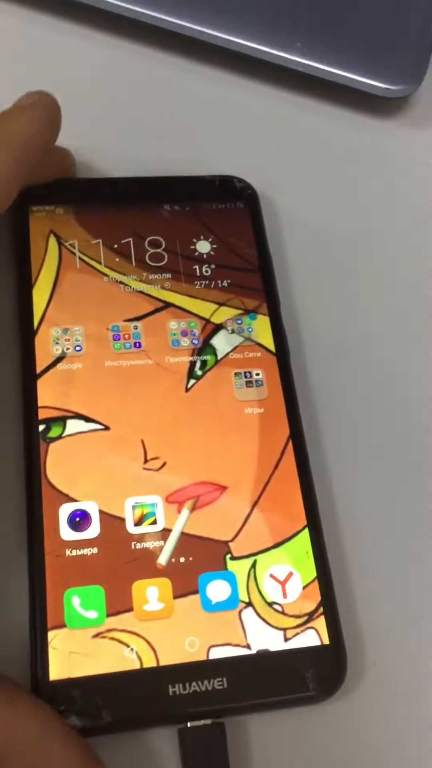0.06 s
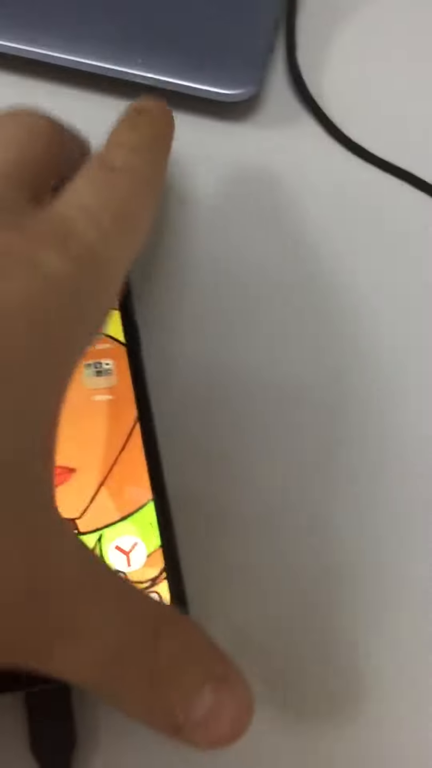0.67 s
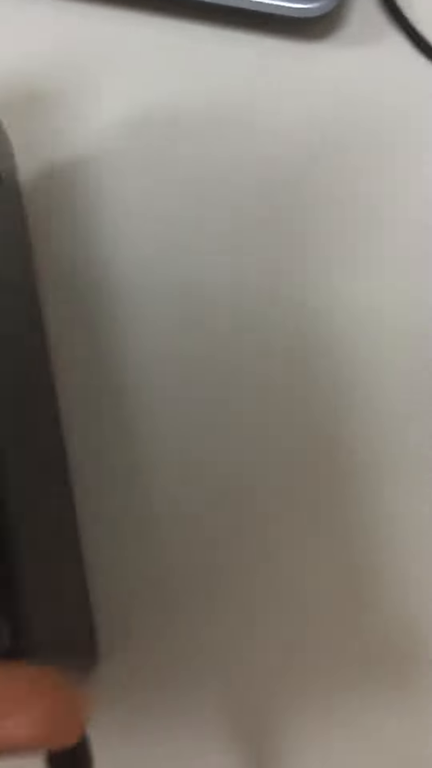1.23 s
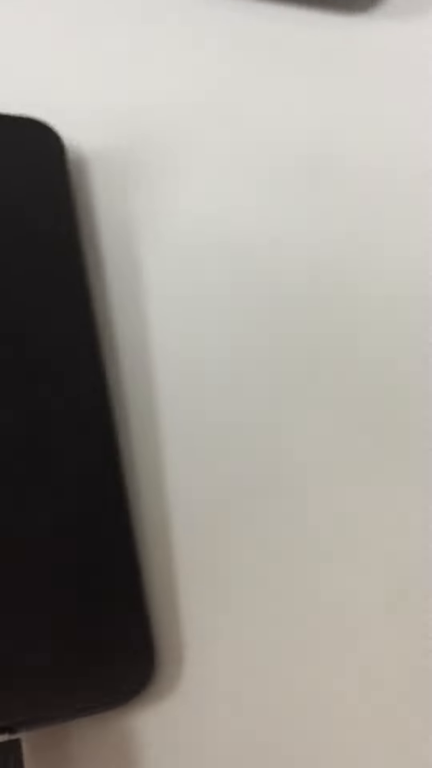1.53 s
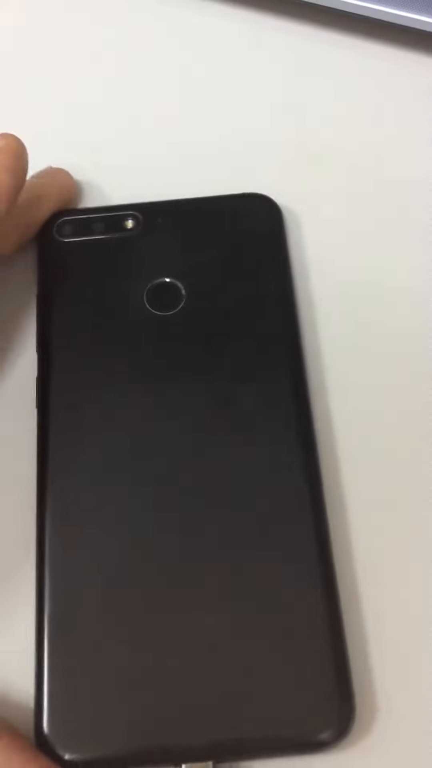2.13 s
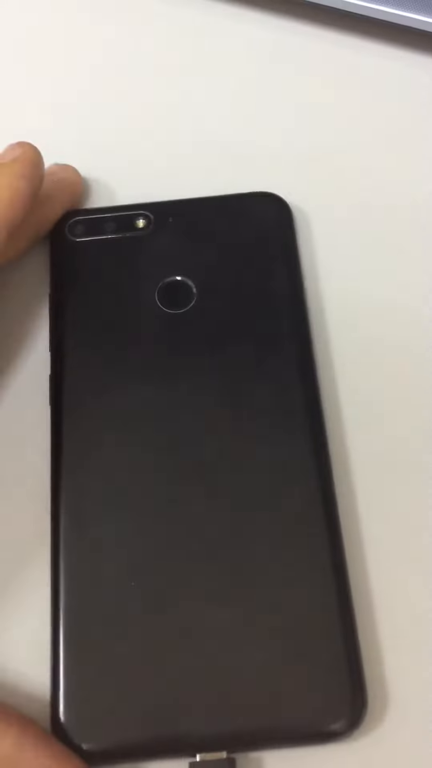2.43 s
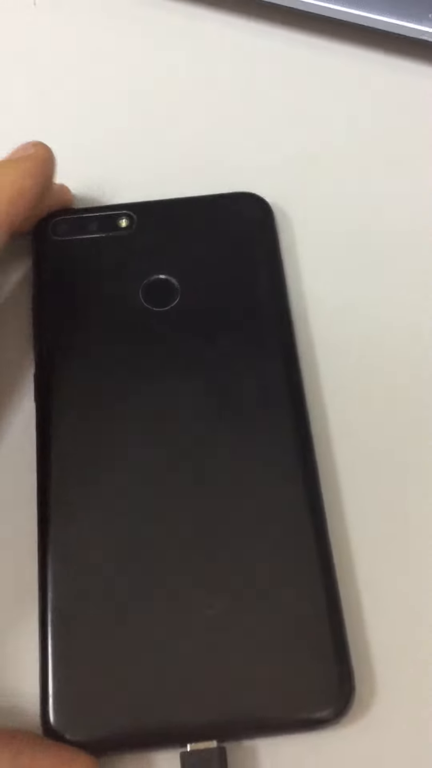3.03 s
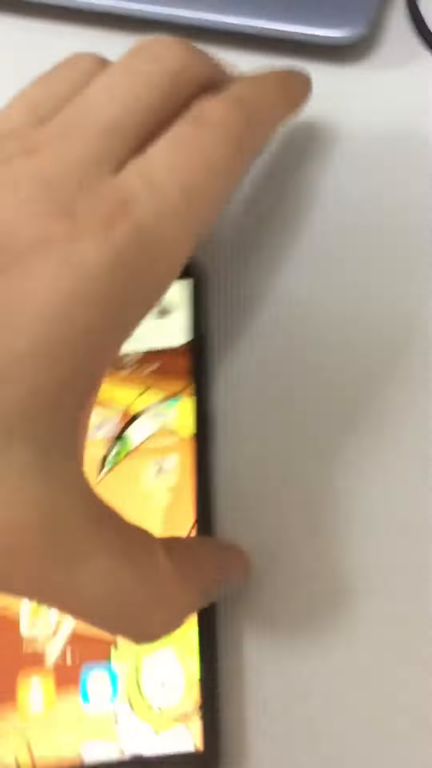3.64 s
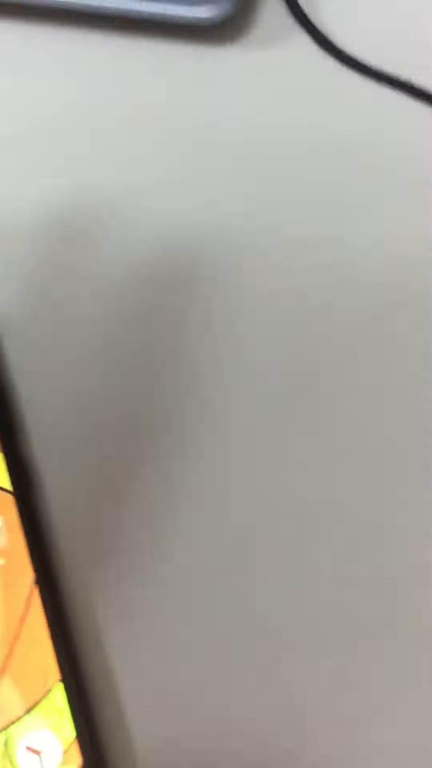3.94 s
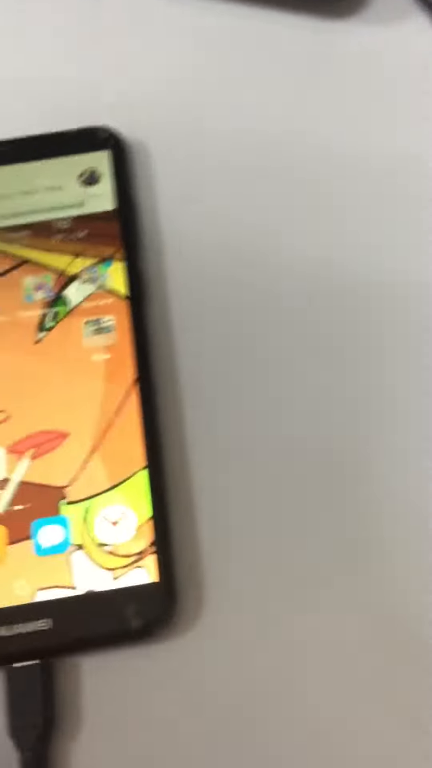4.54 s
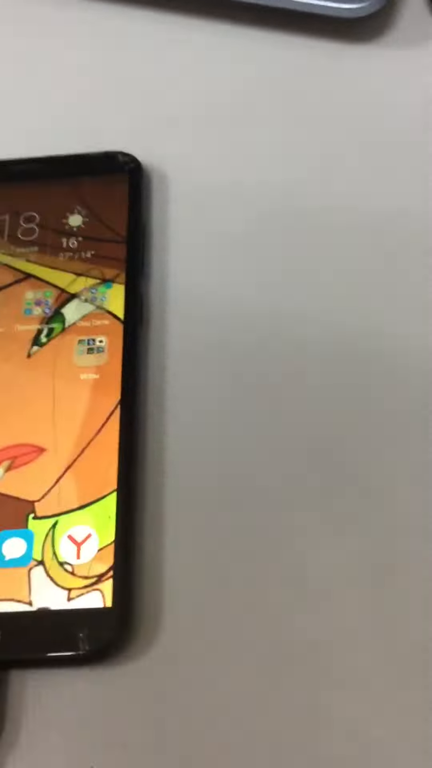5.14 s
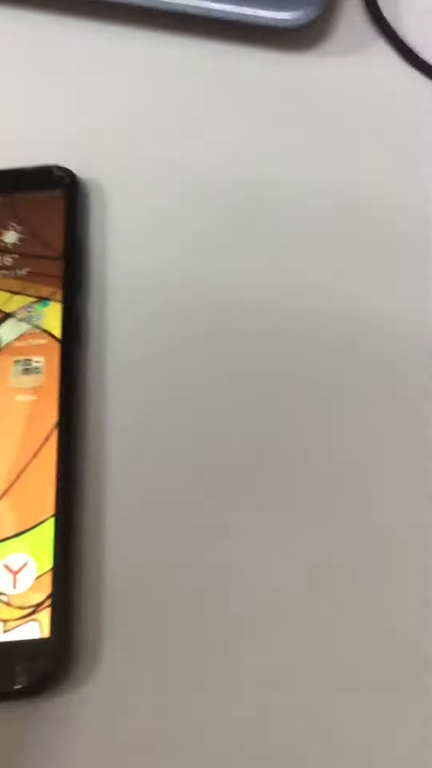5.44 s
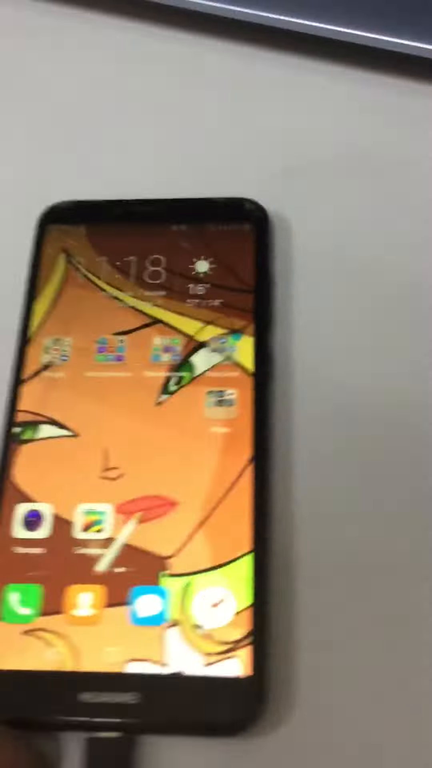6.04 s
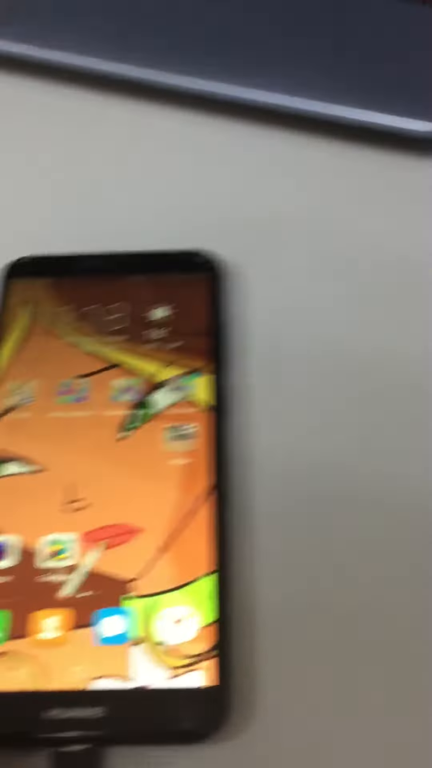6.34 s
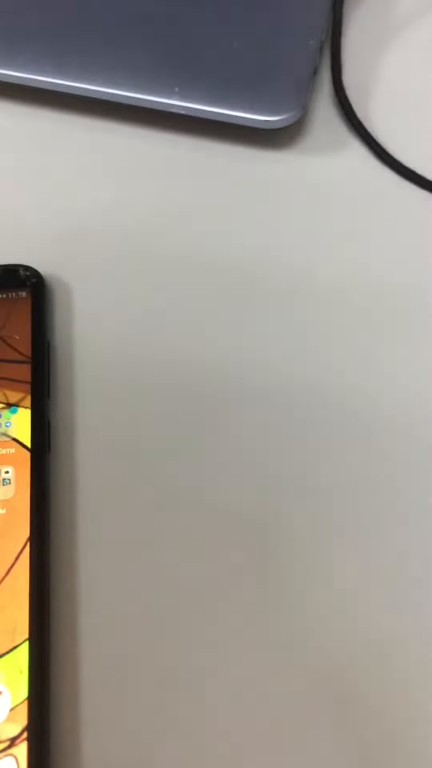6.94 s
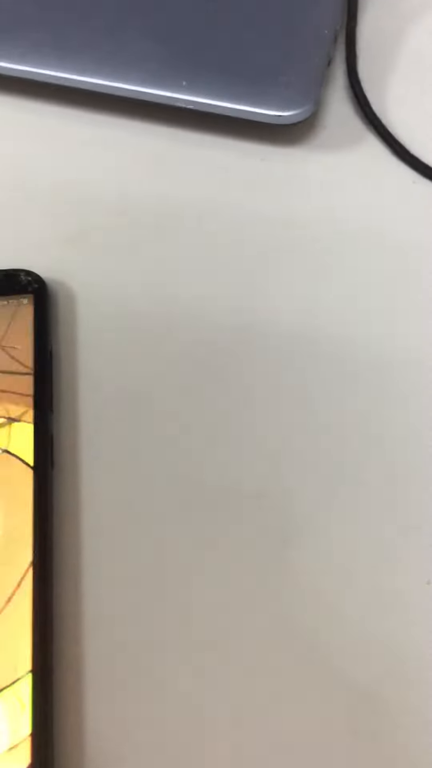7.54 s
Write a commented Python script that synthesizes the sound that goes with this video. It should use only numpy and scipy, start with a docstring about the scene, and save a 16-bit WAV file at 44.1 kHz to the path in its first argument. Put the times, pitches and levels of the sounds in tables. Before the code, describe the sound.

A low electrical hum, a rumble and a faint fan run throughout in a small room. Close to the microphone, fingers tick and rub lightly on a phone's case. At about 1.2 seconds the phone knocks on a desk with a hollow thud, and around 1.5 seconds a fingertip stutters along the case, followed by a click. After a lull there is a tick at 3 seconds, then gritty rubbing. Two knocks land near 3.5 seconds, and at about 3.7 seconds comes the loudest moment, a sharp clatter as the phone drops and rattles to rest, its frame ringing briefly and the desk booming. From 4.1 to 4.4 seconds it slides with a short, hissing scrape. A soft bump follows at 4.7 seconds, a click at 4.9 and another soft bump at 5.6. After a few faint ticks, only the hum remains until about 8 seconds.

```python
"""Fingers tick and rub on a phone's case; then it knocks on a desk as it is turned over and back.
Each knock booms the desk top and rings the phone's frame. Let go, it chatters to rest and is slid aside,
hissing over the grain. The microphone is close by, in a small room with a short reverberation;
a mains hum, a small fan and a low rumble run underneath."""
import sys
import numpy as np
from scipy import signal
from scipy.fft import rfft, irfft, next_fast_len
from scipy.io import wavfile
from scipy.ndimage import uniform_filter1d

SR = 44100
rng = np.random.default_rng(int(sys.argv[2]) if len(sys.argv) > 2 else 0)


def master_out(mix):
    """Clip the mix to full scale and print it as 16-bit PCM to the path in sys.argv[1]."""
    frames = np.transpose(np.atleast_2d(mix))
    ceiling = np.clip(frames, -1, 1)
    pcm = np.round(ceiling * 32767).astype(np.int16)
    wavfile.write(sys.argv[1], SR, pcm)


N = 343725
TIME = np.arange(N) / SR
RING_TIME = TIME[:SR // 2]

# Tones of the mains and the fan. Each row: pitch in Hz, rms level in dB, waver in dB.
HUM_TONES = [(118.8, -49, 0.4), (193.3, -54.5, 1.5), (405, -82, 2)]
# Noise spectra. Each row: frequency in Hz, relative density in dB.
RUMBLE_SPECTRUM = [(20, -34.5), (33, -21.5), (41, -11.5), (49, 6.5), (65, 1), (90, -2.5), (150, 4),
                   (210, -10), (270, -18.5), (400, -43)]
FAN_SPECTRUM = [(160, -41.5), (280, -4), (386, 1.5), (413, -7.5), (610, -8), (800, -2.5), (1030, -6.5),
                (1200, -4), (1350, -10.5), (1520, -5), (2490, -13.5), (5700, -20), (7470, -24.5),
                (11800, -32), (16000, -32)]
TICK_SPECTRUM = [(200, -18), (700, 2), (1300, -1.5), (2200, -1), (3500, -1.5), (5000, -5.5), (8000, -9.5),
                 (11000, -19), (16000, -18.5)]
GRIT_SPECTRUM = [(150, -18), (450, -3), (900, 0.5), (1500, -6.5), (2100, -3), (2600, -10.5), (3200, -11.5),
                 (4700, -18), (8000, -26.5), (16000, -38)]
SLIDE_SPECTRUM = [(120, 4), (250, -11), (370, -2), (550, -10.5), (1000, -2.5), (1750, -6), (2250, -1.5),
                  (2750, -5.5), (4000, -9), (8400, -6.5), (10000, -13.5), (16000, -19)]
CHATTER_SPECTRUM = [(300, -6), (900, 1), (2200, -1.5), (3000, -7), (4500, -12), (5400, -1), (7500, -11),
                    (9700, -9.5), (11000, -18), (16000, -18)]
CRACK_SPECTRUM = [(200, -24.5), (600, 3), (1200, -0.5), (2000, -8.5), (2700, -2), (3700, -6.5), (4600, -10),
                  (6000, -12.5), (9000, -28), (11000, -28), (16000, -32.5)]
# Modes of the desk top, the phone's frame and glass, and its plastic case.
# Each row: frequency in Hz, relative level in dB, time to fall 60 dB (t60) in seconds.
DESK_MODES = [(111.7, -1.5, .27), (144.46, -9, 0.38), (173.4, -7, .12), (218.2, 0.5, 0.11),
              (224.5, 3, 0.074), (285.5, -8, 0.094), (351.7, -2.5, 0.1), (373.5, -6, 0.17), (469, -10, .15),
              (542, -3.5, 0.18), (602, -9, 0.054), (660.5, -9.5, 0.14), (733.4, -6, 0.11),
              (791.4, -1.5, .11), (920, -12.5, .1), (1100, -6, .11), (1096, -6.5, 0.18)]
FRAME_MODES = [(2005, 2, .15), (2210, -4, .18), (2552, -1, .13), (2842, 1, .08), (5115, -9, .18),
               (5262, -7, .27), (5548, -8, .13), (6743, -9, .2), (8312, -13, .12), (9711, -13, .17),
               (10100, -13, .15), (11430, -19, .17), (14150, -23, .13)]
CASE_MODES = [(1362, -7, .07), (1535, -6, .07), (1762, -5, .07), (1930, -4, .05), (2083, -4, .07),
              (2277, -9, .07), (3180, -9, .04), (3620, -5, .035), (3790, -6, .035)]
# Nails and fingertips on the case. Each row: start in seconds, level in dB, tilt in dB per octave.
FINGER_TICKS = [(.096, -55, -6), (.203, -50, -6), (.272, -50.5, -4), (0.91, -42, 7), (.9503, -44, 4),
                (1.0852, -43, 1), (1.132, -31, -4.5), (1.6082, -32.5, 2), (1.911, -46.5, -4.5),
                (3.0047, -35.5, -2.5), (3.4459, -42, -4), (3.627, -33, -3), (4.9137, -32, 6),
                (4.9334, -42.5, 2.5), (5.877, -57.5, 4), (5.931, -57, 5), (6.1, -55, -3.5)]
# A fingertip slips along the case. Each row: start and length in seconds, slips per second, level in dB.
FINGER_STUTTERS = [(1.067, 0.058, 250, -36.5), (1.466, .052, 228, -24.5), (1.51, .075, 258, -31),
                   (1.646, 0.18, 250, -50.5)]
# Skin and case rub over the desk.
# Each row: start and length in seconds, level in dB, tilt in dB per octave, squeak in Hz.
RUB_STROKES = [(.088, 0.033, -56.5, -5, 910), (.195, 0.18, -62.5, 0, 1050),
               (0.875, 0.065, -51.5, 3.5, 5630), (1.082, 0.049, -43, 1, 3200),
               (1.126, 0.034, -35, -1, 3100), (1.473, 0.08, -46, -1.5, 980), (1.789, .12, -56.5, -1, 1260),
               (3.246, .135, -37.5, -2, 1000), (3.321, 0.043, -35, -3, 837), (3.496, .016, -18, -6, 867),
               (3.534, .15, -44.5, -1, 3310), (3.6259, .014, -23, -0.5, 2200),
               (4.262, 0.039, -46, -5, 1500), (4.561, 0.18, -72, 6, 8590), (4.896, 0.042, -48.5, 3, 1353),
               (4.931, 0.061, -51.5, 5.5, 1250), (5.75, 0.078, -66.5, 6, 1698)]
# The whole desk sways. Each row: start in seconds, frequency in Hz, level in dB, t60 in seconds.
DESK_SWAYS = [(3.655, 49.45, -34, 1.0), (3.675, 61.7, -30, .35)]
# The phone meets the desk. Each row: start in seconds, thud level in dB, thud corner in Hz,
# crack level in dB, crack tilt in dB per octave.
PHONE_KNOCKS = [(1.2255, -13, 365, -27.5, -2.2), (3.4690, -13, 380, -26.5, 0.75),
                (3.4993, -18, 848.5, -23, -8.5), (3.5610, -40.5, 700, -36.5, -2),
                (3.6421, -31, 450, -22.5, -1), (3.6516, -16, 1305, -3, -0.47),
                (3.6680, -35.5, 900, -13, -0.4), (3.6747, -11.5, 610, -13.5, -2),
                (4.687, -32.5, 258.7, -66.5, -3), (5.622, -37.5, 326, -54.5, -14)]


def undb(db):
    """Decibels to gain."""
    return 10 ** (np.asarray(db) / 20)


def unit(x):
    """Scale to rms 1."""
    return x / np.sqrt(np.mean(x ** 2))


def fade(t60):
    """Exponential decay, 60 dB down after t60 seconds."""
    return np.exp(-np.log(1000) * RING_TIME / t60)


def add(out, start_s, x):
    """Mix x into out from start_s on."""
    start = int(start_s * SR)
    out[start:start + len(x)] += x[:N - start]


def colour(x, spectrum, tilt=0):
    """Shape x by a spectrum, tilted in dB per octave, with an 18 dB per octave bass roll-off; rms 1."""
    hz, db = np.transpose(spectrum)
    size = next_fast_len(len(x))
    octave = np.log2(np.fft.rfftfreq(size, 1 / SR) + 1)
    below = np.minimum(octave - np.log2(hz[0]), 0)
    gain_db = np.interp(octave, np.log2(hz), db + tilt * np.log2(hz)) + 18 * below
    return unit(irfft(rfft(x, size) * undb(gain_db), size)[:len(x)])


def lowpass(x, hz, order):
    """Smooth low-pass."""
    return signal.sosfilt(signal.butter(order, hz, fs=SR, output="sos"), x)


def resonate(x, hz, width_hz):
    """Pass x through one resonance."""
    return signal.lfilter(*signal.iirpeak(hz, hz / width_hz, fs=SR), x)


def ring(modes, corner_hz=SR, tilt=0, lag_turns=.36):
    """Response of a struck body; a softer contact reaches only the modes under its corner."""
    hz, db, t60 = np.transpose(modes)
    gains = undb(db + tilt * np.log2(hz / 2000)) / np.sqrt(1 + (hz / corner_hz) ** 8)
    lags = lag_turns * np.arange(len(hz))  # each mode lags the one below, so the ring builds briefly
    push = 1 - np.exp(-(2 * corner_hz * RING_TIME) ** 2)
    return push * sum(gain * fade(decay) * np.sin(2 * np.pi * (freq * RING_TIME - lag))
                      for freq, gain, decay, lag in zip(hz, gains, t60, lags))


def grains(count, spread_db):
    """Dense tiny impulses, a few much stronger than the rest."""
    return rng.standard_normal(count) * undb(spread_db * np.minimum(rng.exponential(size=count), 6))


def drift(rate_hz):
    """Random drift that takes a new course rate_hz times a second; rms 1."""
    hold = int(SR / rate_hz)
    steps = np.repeat(rng.standard_normal(N // hold + 1), hold)
    return unit(uniform_filter1d(steps, hold)[:N])


def room_tone(rumble_db=-56, fan_db=-65):
    """The bed of the room: wavering mains and fan hum, low rumble and the fan's soft, steady air."""
    hum = np.zeros(N)
    for hz, db, waver_db in HUM_TONES:
        phase = 2 * np.pi * hz * TIME + 0.0785 * drift(12)
        hum += np.sqrt(2) * undb(db + waver_db * drift(14)) * np.sin(phase)
    swell = undb(1.5 * drift(9))
    rumble = undb(rumble_db) * swell * colour(rng.standard_normal(N), RUMBLE_SPECTRUM)
    air = undb(fan_db) * colour(rng.standard_normal(N), FAN_SPECTRUM)
    return hum + rumble + air


def reflections(direct, level_db=-17, low_t60=0.4, treble_t60=0.22, build_s=0.016):
    """The small room's diffuse answer, faint this close to the desk; the treble dies first."""
    noise = rng.standard_normal(len(RING_TIME))
    low = lowpass(noise, 1800, order=1)
    tail = low * fade(low_t60) + (noise - low) * fade(treble_t60)
    tail *= np.minimum(RING_TIME / build_s, 1)
    return undb(level_db) * signal.fftconvolve(direct, tail / np.linalg.norm(tail))[:N]


def click(t60, tilt, attack_s=0.0012):
    """One damped click of the case."""
    onset = 1 - np.exp(-RING_TIME / attack_s)
    return onset * fade(t60) * colour(rng.standard_normal(len(RING_TIME)), TICK_SPECTRUM, tilt)


def ticks(t60=0.05):
    """Nails and fingertips click on the case, too lightly to stir the desk."""
    out = np.zeros(N)
    for start_s, db, tilt in FINGER_TICKS:
        add(out, start_s, undb(db) * click(t60, tilt))
    return out


def judder(slips):
    """The desk top shaken by a run of slips; rms 1."""
    desk = resonate(ring(DESK_MODES, corner_hz=450), hz=230, width_hz=170)
    return unit(signal.fftconvolve(slips, desk)[:len(slips)])


def stutters(jitter=0.051, skin_hz=330, shake_db=-8):
    """Skin stretches and lets go, a sawtooth rounded by the soft fingertip; the desk shakes along."""
    out = np.zeros(N)
    for start_s, length_s, rate_hz, db in FINGER_STUTTERS:
        count = int(length_s * SR)
        slip_hz = rate_hz * (1 + jitter * drift(150)[:count])
        phase = 2 * np.pi * np.cumsum(slip_hz) / SR
        slips = unit(lowpass(signal.sawtooth(phase), skin_hz, order=4))
        shake = unit(judder(rng.standard_normal(SR // 2))[-count:])
        add(out, start_s, undb(db) * (slips + undb(shake_db) * shake) * np.hanning(count))
    return out


def rubs(squeak_db=-3.5, judder_db=-15, judder_growth=.57):
    """Short gritty strokes; the skin sticks and slips, squeaking dryly and shaking the desk."""
    out = np.zeros(N)
    for start_s, length_s, db, tilt, squeak_hz in RUB_STROKES:
        count = int(length_s * SR)
        pressure = np.sin(np.linspace(0, np.pi, count))
        slips = grains(SR // 2, spread_db=4.0)
        grit = unit(colour(slips, GRIT_SPECTRUM, tilt)[-count:])
        width_hz = 0.4 * squeak_hz
        squeak = resonate(resonate(slips, squeak_hz, width_hz), squeak_hz, width_hz)
        friction = undb(db) * (grit + undb(squeak_db) * unit(squeak[-count:]))
        shake = undb(judder_db + judder_growth * db) * unit(judder(slips)[-count:])
        add(out, start_s, pressure * (friction + shake))
    return out


def slide(start_s=4.103, snag_s=4.1818, shove_s=4.186, stop_s=4.435,
          drag_db=-47, shove_db=-34, snag_db=-10.5, uneven_db=1.45):
    """The phone's smooth back hisses over the desk's grain: a shove, a snag on a speck, a slow drag."""
    attack, release = (TIME - start_s) / 0.015, (stop_s - TIME) / 0.056
    moving = np.clip(np.minimum(attack, release), 0, 1)
    shove_width_s = np.where(TIME < shove_s, 0.04, 0.028)  # rises more slowly than it falls
    shove = np.exp(-((TIME - shove_s) / shove_width_s) ** 2)
    speed = moving * (undb(drag_db) + undb(shove_db) * shove) * undb(uneven_db * drift(70))
    out = speed * colour(grains(N, spread_db=2.5), SLIDE_SPECTRUM)
    add(out, snag_s, undb(snag_db) * click(t60=0.0069, tilt=1))
    return out


def chatter():
    """The phone rattles on the desk in ever smaller bounces."""
    return colour(grains(len(RING_TIME), spread_db=1.5), CHATTER_SPECTRUM) * fade(t60=0.25)


def drop(drop_s=3.668, chatter_db=-21.5, shimmer_db=-31.5):
    """Let go, the phone chatters to rest, keeping its frame ringing; the desk sways under its weight."""
    out = np.zeros(N)
    bounces = grains(len(RING_TIME), spread_db=1.0) * fade(t60=.07)
    shimmer = signal.fftconvolve(bounces / np.linalg.norm(bounces), ring(FRAME_MODES, tilt=3.5))
    add(out, drop_s, undb(chatter_db) * chatter())
    add(out, drop_s, undb(shimmer_db) * shimmer)
    for start_s, *mode in DESK_SWAYS:
        add(out, start_s, ring([mode], corner_hz=100))
    return out


def knocks(snap_db=2, case_db=-4.5, buzz_db=-26.5, frame_db=-26.5, frame_growth=.6, detune=0.014):
    """Close to the microphone, each blow booms the desk, cracks and buzzes the case, rings the frame."""
    out = np.zeros(N)
    frame = ring(FRAME_MODES)
    crack_decay = undb(snap_db) * fade(t60=.012) + .5 * fade(t60=0.05016)  # a snap, then crowded modes
    for start_s, thud_db, corner_hz, crack_db, tilt in PHONE_KNOCKS:
        thud = undb(thud_db) * ring(DESK_MODES, corner_hz)
        # grip and contact point detune the case from blow to blow
        gripped = [(hz * (1 + detune * rng.standard_normal()), db, t60) for hz, db, t60 in CASE_MODES]
        crack = colour(rng.standard_normal(len(RING_TIME)), CRACK_SPECTRUM, tilt) * crack_decay
        case = crack + undb(case_db) * ring(gripped, tilt=tilt) + undb(buzz_db) * chatter()
        # the frame rings with the crack's treble: louder with the crack, and 1.3 dB more for each dB per octave
        # of its tilt
        ring_db = frame_db + frame_growth * crack_db + 1.3 * tilt
        add(out, start_s, thud + undb(crack_db) * case + undb(ring_db) * frame)
    return out


def scene():
    """At the desk, in mono: the handling up close, its reflections and the room tone behind."""
    handling = knocks() + drop() + ticks() + rubs() + stutters() + slide()
    return (handling + reflections(handling) + room_tone())[None]


def record(dry, low_cut_hz=40, overload=.92, top_hz=16000):
    """The microphone sheds the deepest bass and overloads on the loudest peaks; the top is cut."""
    sound = signal.sosfilt(signal.butter(5, low_cut_hz, "high", fs=SR, output="sos"), dry)
    sound = np.clip(sound, -overload, overload)
    return signal.sosfilt(signal.ellip(10, .2, 70, top_hz, fs=SR, output="sos"), sound)


dry = scene()
out = record(dry)
master_out(out)
```